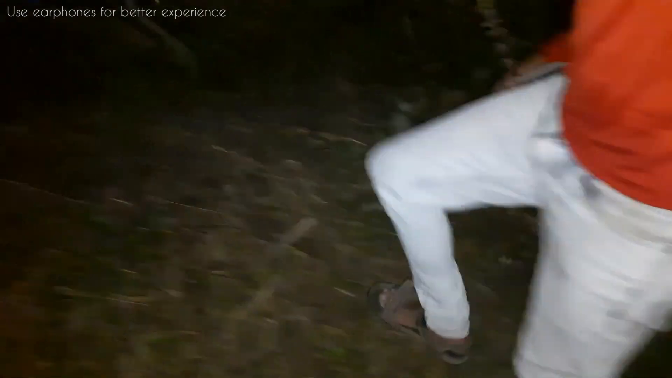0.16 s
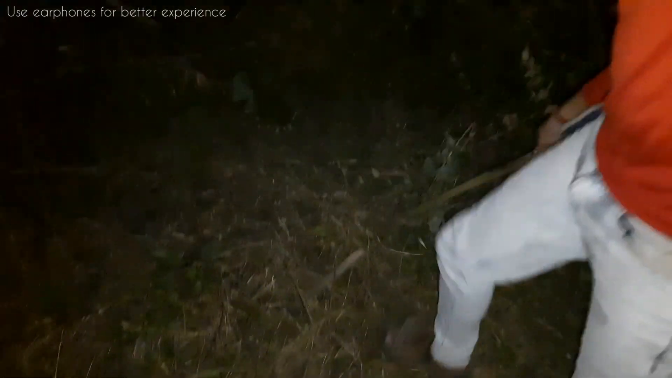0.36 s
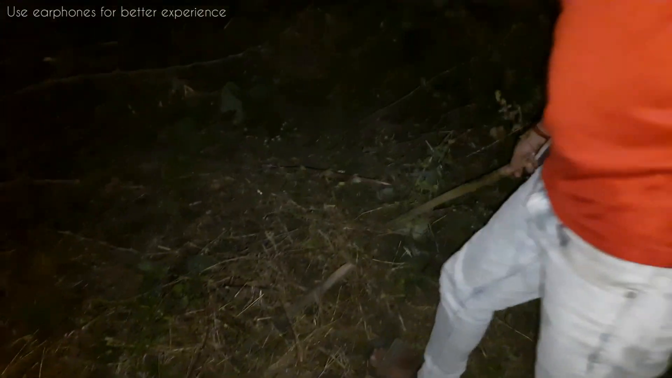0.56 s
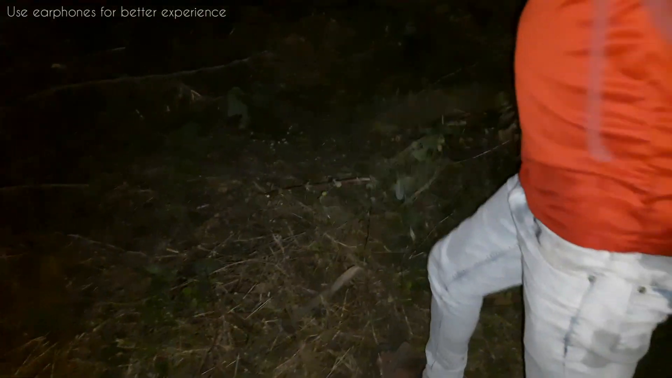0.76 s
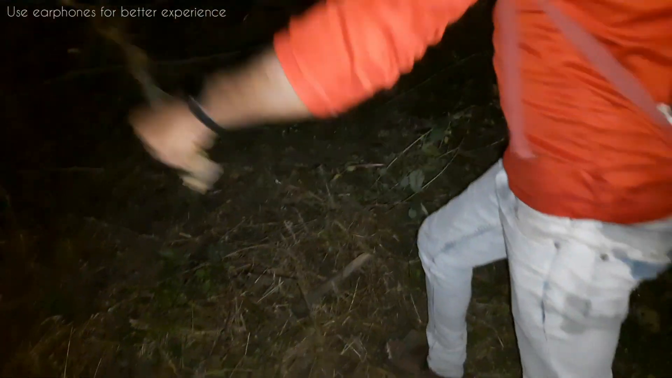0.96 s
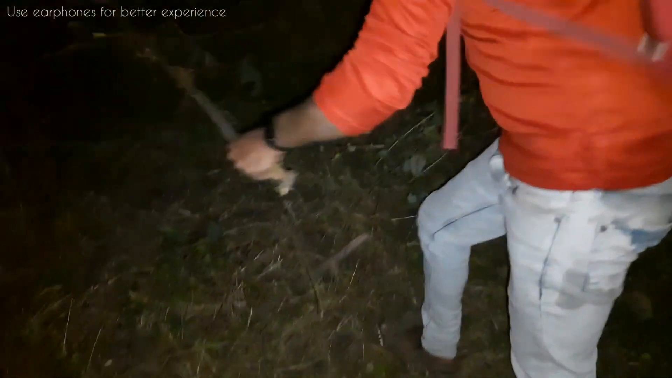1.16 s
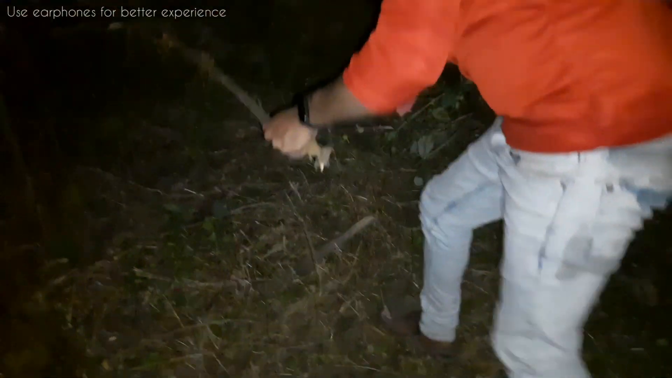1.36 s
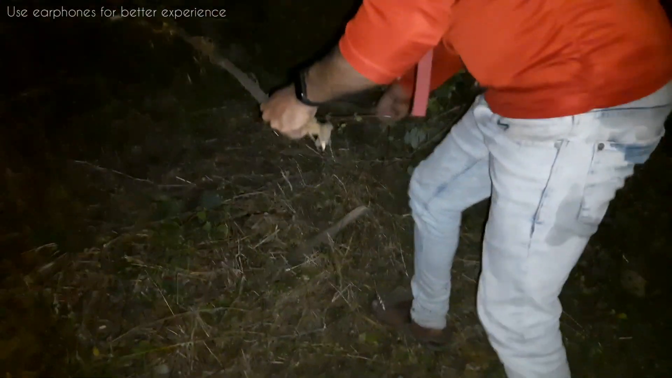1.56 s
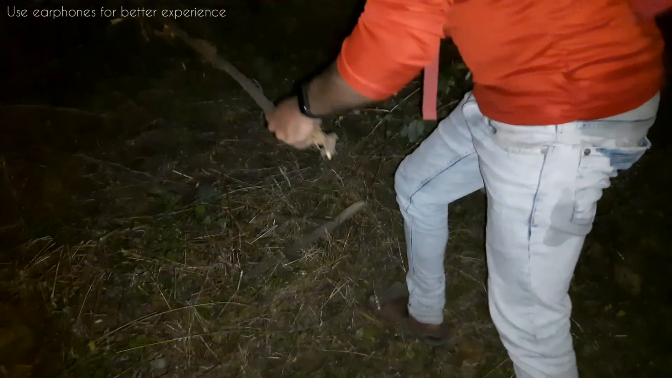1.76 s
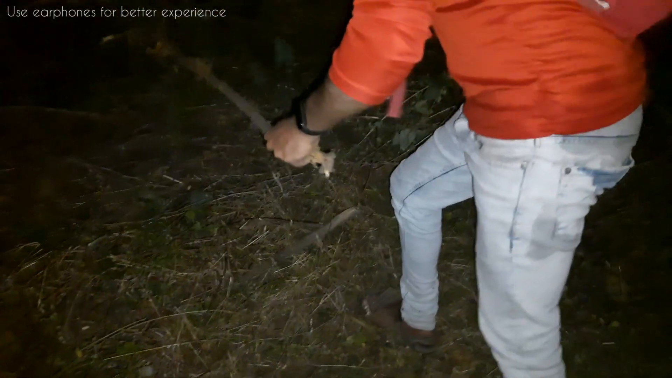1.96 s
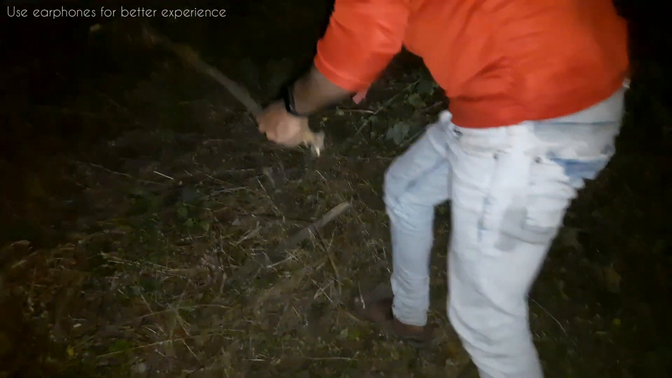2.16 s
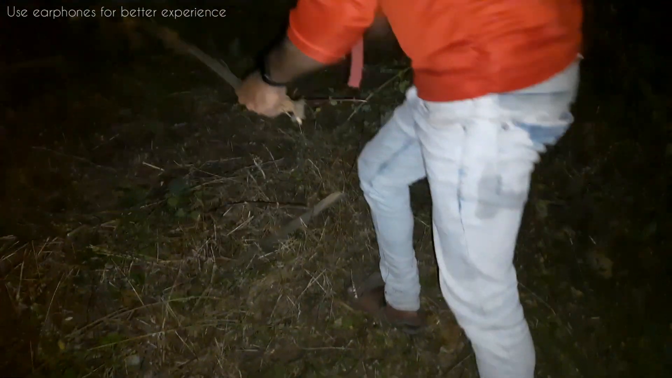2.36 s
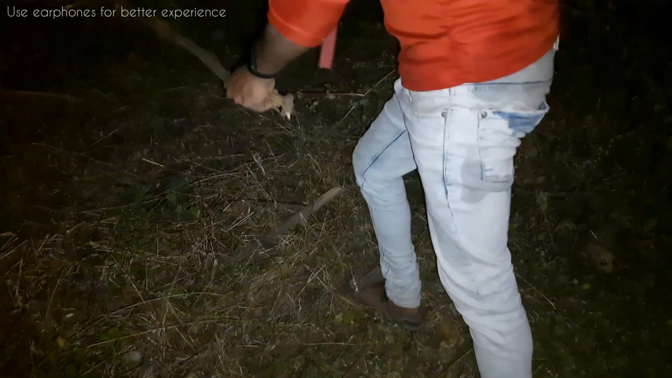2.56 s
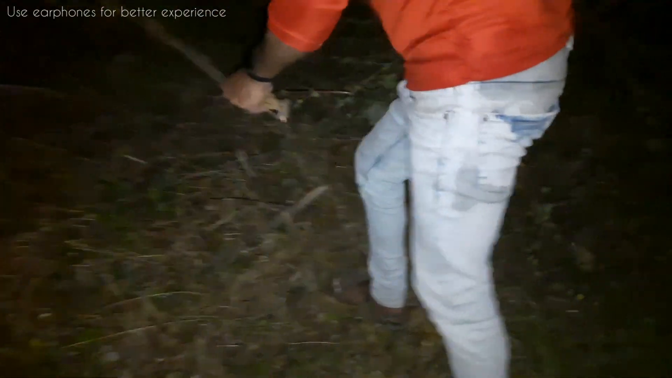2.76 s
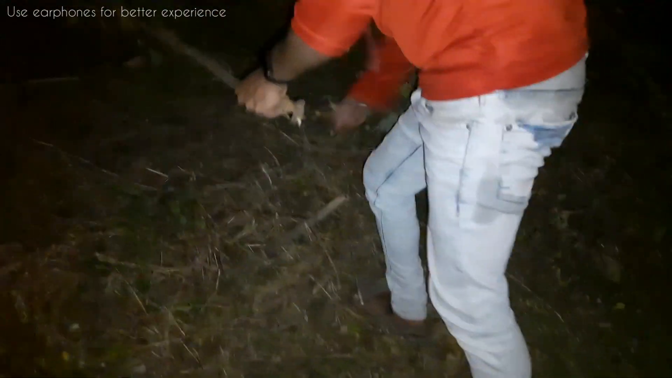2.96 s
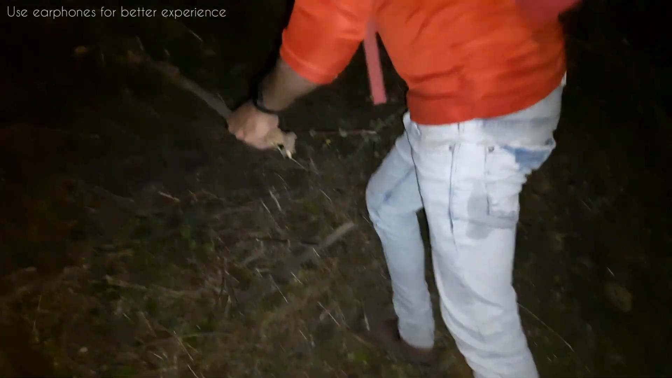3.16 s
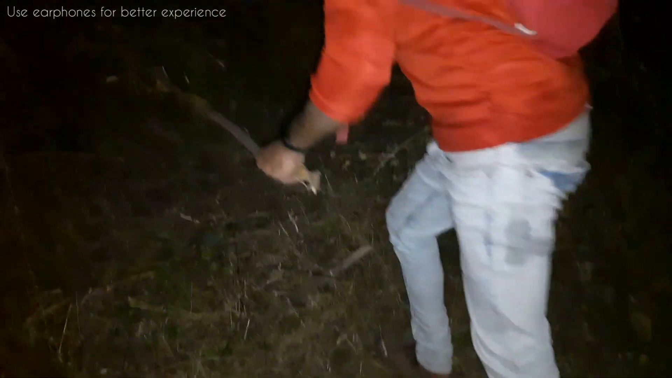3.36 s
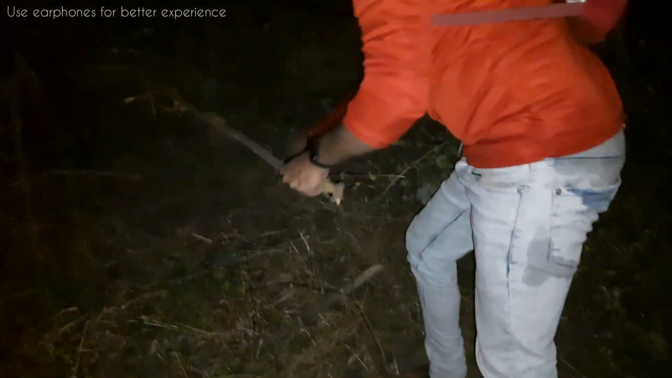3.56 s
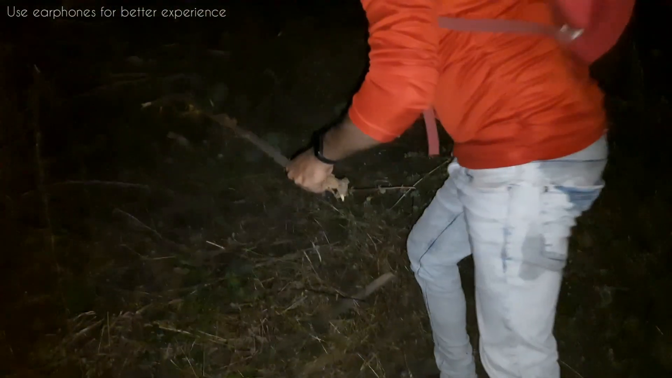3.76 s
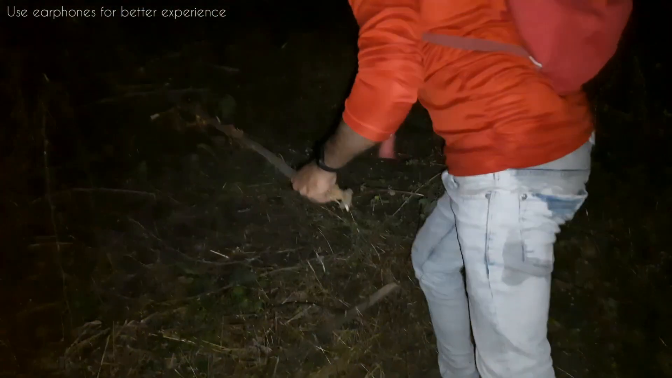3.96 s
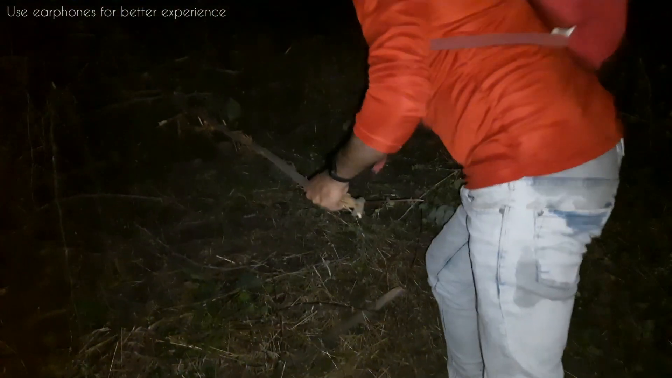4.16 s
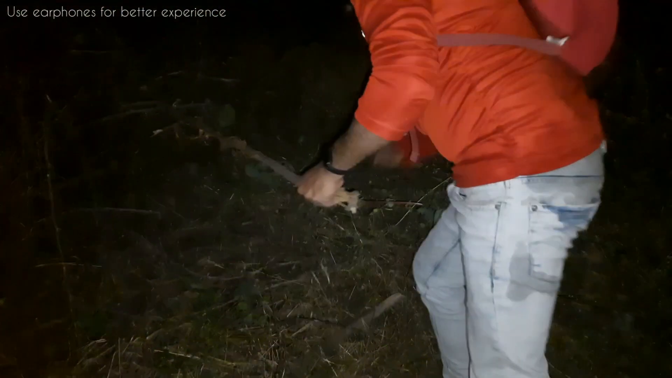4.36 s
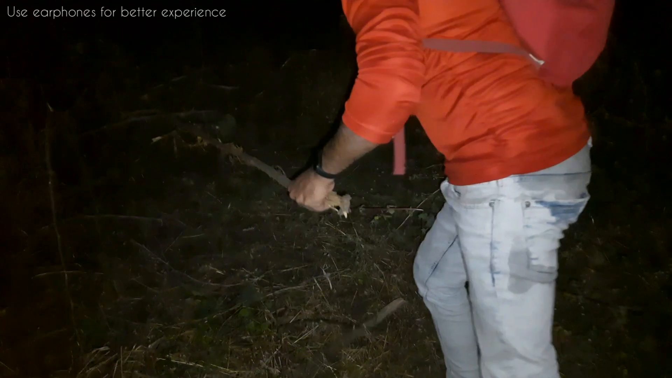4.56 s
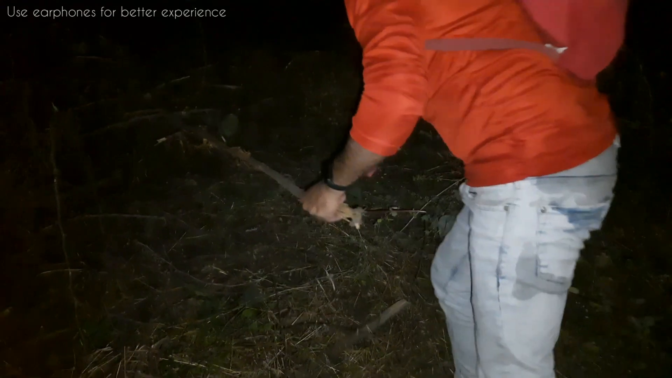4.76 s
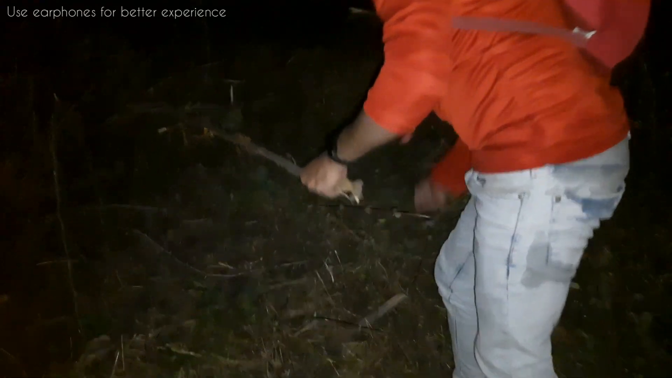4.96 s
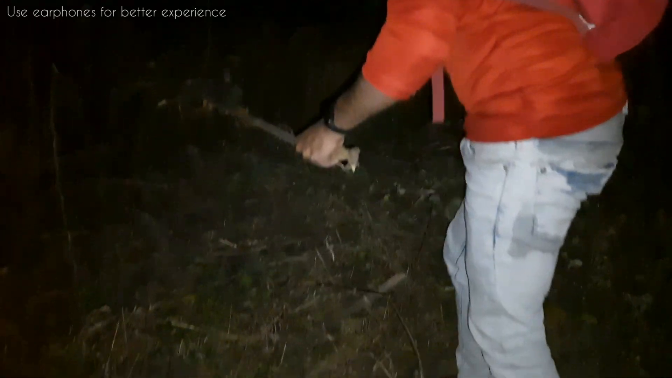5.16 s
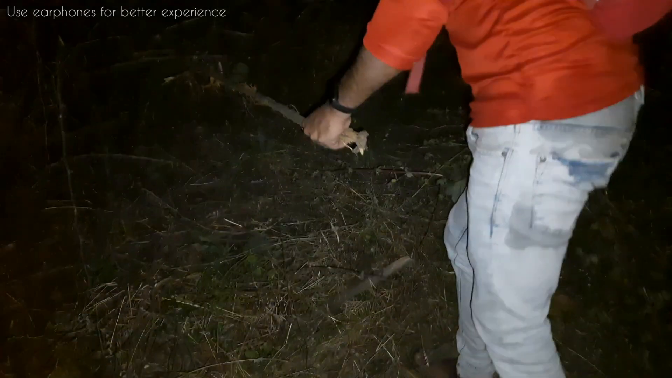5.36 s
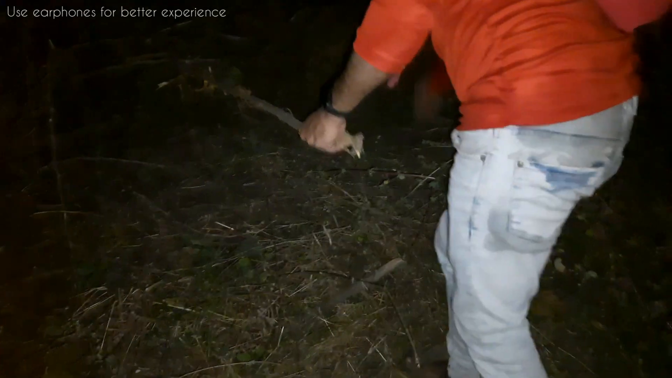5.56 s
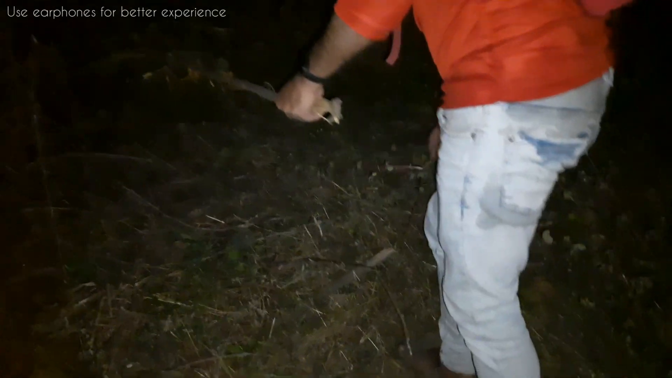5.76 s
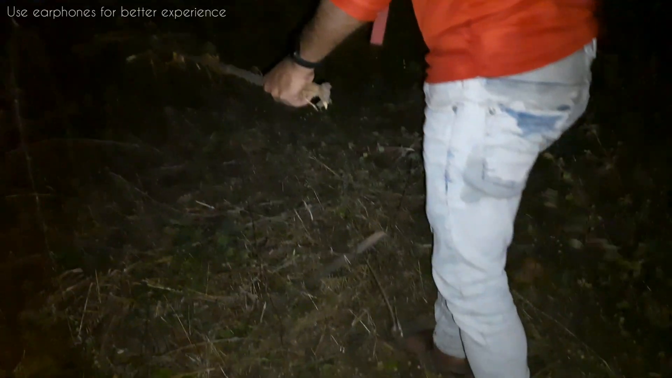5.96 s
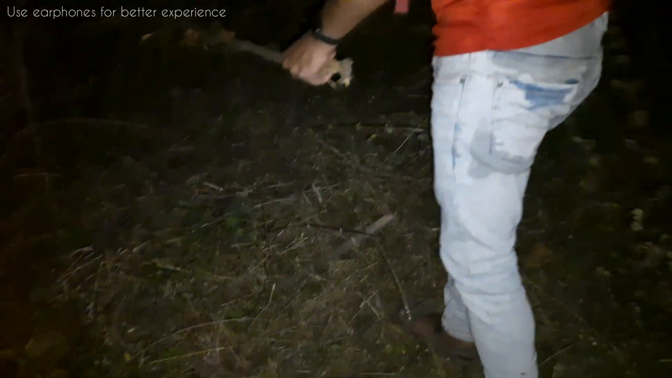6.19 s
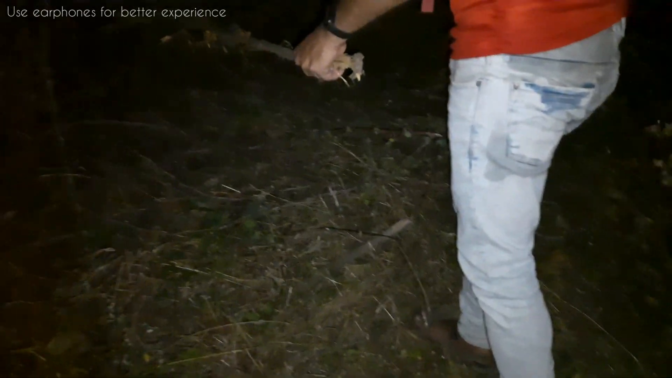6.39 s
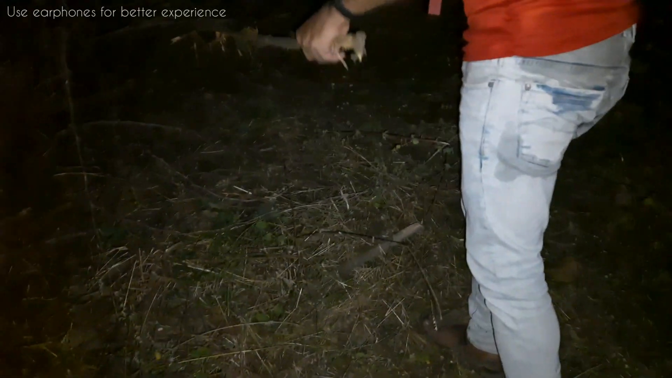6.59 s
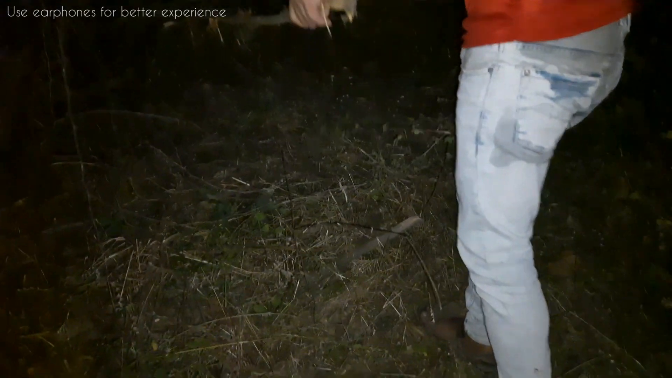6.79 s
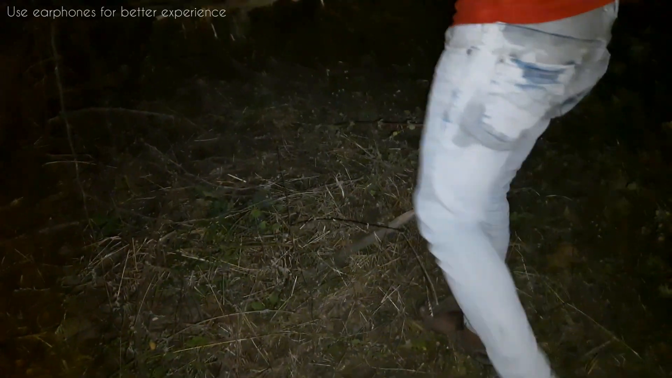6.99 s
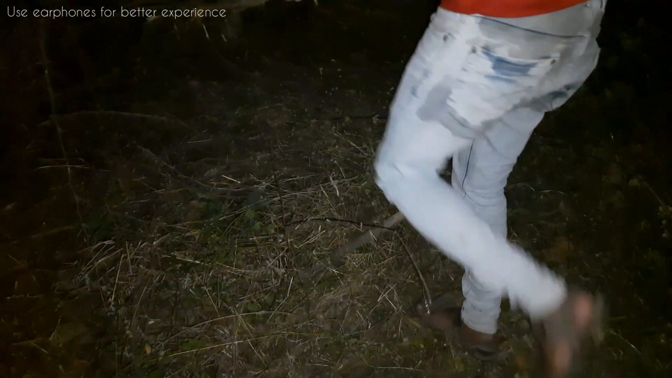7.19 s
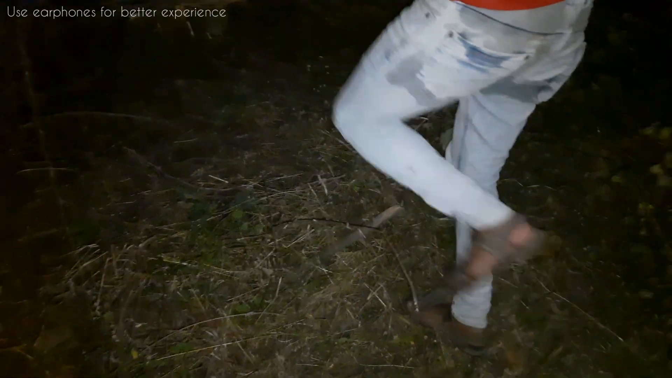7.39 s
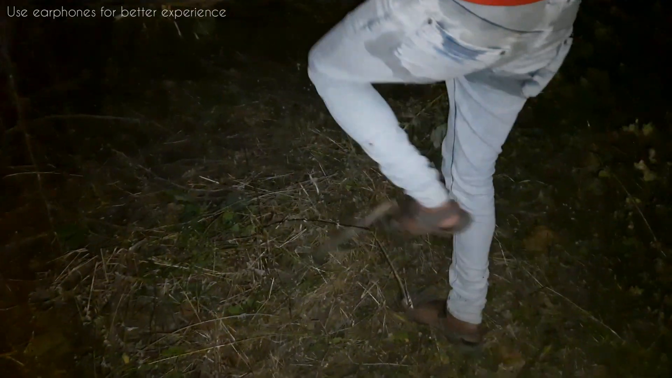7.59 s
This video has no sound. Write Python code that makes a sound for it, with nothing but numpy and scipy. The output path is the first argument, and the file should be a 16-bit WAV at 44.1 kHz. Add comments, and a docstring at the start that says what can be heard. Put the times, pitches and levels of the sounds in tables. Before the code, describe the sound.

Close, crisp swings of a stick beat down dry undergrowth in a steady rhythm, while grass rustles and crickets trill faintly.

```python
"""Beating down dry brush at night

Someone steps into thorny brush and beats it with a stick, seven swings, close to a phone. Each swing
displaces air, clips the outer twigs, crashes into the thicket and leaves the stems settling. Twigs snap
by brittle fracture, dead wood knocks in damped modes and dry blades rustle against the legs.
Crickets trill all round by stridulation, and a far animal yelps."""
import sys
import numpy as np
from scipy import signal
from scipy.fft import rfft, irfft
from scipy.io import wavfile

SR = 44100
rng = np.random.default_rng(int(sys.argv[2]) if len(sys.argv) > 2 else 0)


def dump_mix(stems):
    """Bounce the given channels to the path in sys.argv[1] as a 16-bit WAV at rate SR."""
    frames = np.atleast_2d(stems).T  # one column per channel
    limited = np.clip(frames, -1, 1)  # hard clip at full scale
    pcm = np.round(limited * 32767).astype(np.int16)
    wavfile.write(sys.argv[1], SR, pcm)


N = 336571
TIME = np.arange(N) / SR
TOP_HZ = 15950


# Swings of the stick; the first touch comes lead_s before the crash:
# crash_s, crash_db, lead_s, touch_db, rise_s, settle_db, thud_db, air_db, branch_hz, branch_db
SWINGS = [(1.386, -15, 0.031, -48, .012, -29.5, -46, -35, 1540, -13.5),
          (2.232, -15.5, 0.025, -18.5, 0.009, -31.5, -43, -41, 2320, -29),
          (2.925, -14, .0195, -15, 0.0091, -33.5, -33.5, -42.5, 3580, -9.5),
          (3.598, -16, 0.017, -12.5, 0.0026, -33.5, -39, -37.5, 3130, -20),
          (4.265, -13, .011, -15.5, 0.0019, -37, -38.5, -48, 3020, -15),
          (4.895, -15.5, 0.032, -37, 0.0055, -34, -38, -56, 5400, -10),
          (5.6258, -19.5, .0355, -13.5, 0.0021, -34.5, -41, -53, 3900, -16)]
def swings():
    """Impact excitation: the stick clips the outer twigs, ploughs on and stops; the thicket settles."""
    breaking = bending = settling = thud = air = branches = 0
    scrape = crackle(spread_db=5.5, count=40000)
    for crash_s, crash_db, lead_s, touch_db, rise_s, settle_db, thud_db, air_db, *branch in SWINGS:
        touch_s = crash_s - lead_s
        touched = TIME > touch_s
        ploughing = .4 * pulse(touch_s, .0006, .06) * (TIME < crash_s)
        touch = undb(touch_db) * np.maximum(pulse(touch_s, .0009, .004), ploughing)
        blow = .6 * pulse(crash_s, rise_s, .012) + .55 * pulse(crash_s, rise_s, .038)
        crash = undb(crash_db) * blow * touched
        flex = undb(crash_db) * pulse(crash_s + .00062, rise_s, .027) * touched
        settle = undb(settle_db) * pulse(crash_s + .026, .014, .13)
        breaking += touch + crash
        settling += settle
        bending += 1.57 * touch + flex + 2.03 * settle
        thud += undb(thud_db) * (pulse(crash_s + .0014, .012, .011) + .15 * pulse(crash_s, .01, .071))
        air += undb(air_db) * pulse(touch_s - .009, .014, .017)
        branches += branch_ring((1.3 * touch + .5 * crash) * scrape, touch_s, *branch)
    thicket = twigs(breaking, settling) + branches + stems(bending)
    return thicket + ground_thud(thud) + displaced_air(air, thud)


def branch_ring(force, touch_s, hz, db, size=22050):
    """Flexural vibration: the thickest branch in the way rings in its first two bending modes."""
    out = np.zeros((2, N))
    near = slice(int(touch_s * SR) - size // 10, int(touch_s * SR) + size)
    push = undb(db) * force[:, near]
    out[:, near] = resonance(push, hz, q=18) + .61 * resonance(push, 2.3 * hz, q=14)
    return out * pan(db=-3)


# Spectrum of breaking twigs: frequency_hz, level_db
TWIG_SPECTRUM = [(500, -47), (1200, -8), (2200, -2.5), (3300, -2.5), (5500, -1.5), (8000, -1.5),
                 (10000, -3), (12300, 2), (15500, -4)]
def twigs(breaking, settling):
    """Superposition: thousands of tiny fractures merge into a bright crash."""
    fractures = breaking * crackle(spread_db=0, count=140000)
    ticks = settling * crackle(spread_db=-.5, count=70000)
    return colour(fractures + ticks, TWIG_SPECTRUM) * pan(db=1.5)


# Spectrum of thick stems: frequency_hz, level_db
STEM_SPECTRUM = [(100, -10.5), (300, 0.5), (520, -8.5), (820, 0.5), (1000, 0), (1300, -10), (1800, -2),
                 (3000, -8.5), (6000, -9)]
def stems(bending):
    """Bending stress: thick stems give way in sparser, lower crackles."""
    cracks = bending * crackle(spread_db=2, count=20000, port_lag_s=.00021)
    return undb(-12.5) * colour(cracks, STEM_SPECTRUM)


# Spectrum of the thud: frequency_hz, level_db
THUD_SPECTRUM = [(20, -19), (55, -10.5), (120, 0.5), (250, -11), (400, -23), (800, -15), (3000, -51)]
def ground_thud(thud):
    """Heavy damping: the ground answers a blow with a short burst of bass noise."""
    return colour(thud * noise(side=.33), THUD_SPECTRUM)


# Spectra of the draught and of the air ahead of the stick: frequency_hz, level_db
DRAUGHT_SPECTRUM = [(20, -26), (55, -1), (85, -9), (150, -10), (1000, -68)]
AIR_SPECTRUM = [(30, -16), (100, -11.5), (180, 3.5), (290, -4), (450, -17), (1000, -45), (4000, -65)]
def displaced_air(air, thud):
    """Turbulence: air is pushed ahead of the stick; its draught hits mainly one microphone port."""
    gust = np.roll(thud, int(.0064 * SR)) * rng.standard_normal((2, N))  # just after the thud
    draught = undb(-6) * colour(gust, DRAUGHT_SPECTRUM) * pan(db=9)
    return draught + colour(air * noise(side=.097), AIR_SPECTRUM)


def struck_twigs():
    """Overload: one twig breaks at first touch and two at the crash, louder for a harder blow."""
    rows = []  # columns as in TWIG_SNAPS
    for crash_s, crash_db, lead_s, touch_db, *_ in SWINGS:
        rows.append((crash_s - lead_s, touch_db + 1.5, 5000, 0))
        for when, pitch in rng.uniform(-1, 1, (2, 2)):
            rows.append((crash_s + .003 * when, crash_db - 2, 9000 * 2 ** (.3 * pitch), 2))
    return rows


# Single twigs breaking underfoot or under the stick: start_s, level_db, ring_hz, pan_db
TWIG_SNAPS = [(0.0266, -23.5, 12670, 6), (.255, -29, 12300, 8), (0.464, -25, 9900, 3),
              (0.5447, -28, 1900, -2), (1.004, -26, 3370, 1), (1.004, -18.5, 8800, -3),
              (1.084, -27, 11000, 1), (1.123, -13, 10500, -3), (1.251, -15.5, 11900, 2.5),
              (1.453, -16, 10200, 8), (1.509, -26, 11900, 4), (2.2209, -10.5, 2300, 2),
              (2.352, -19.5, 9800, -4), (2.437, -30.5, 11400, 4), (2.9057, -11.5, 3500, 0),
              (3.316, -38, 7650, 3), (3.993, -35, 4730, -3), (4.221, -36.5, 2400, -3),
              (4.712, -31.5, 2220, -1), (4.894, -10, 6000, -14.5), (5.634, -9, 9400, 2),
              (6.429, -34.5, 6800, -4), (6.939, -38.5, 7100, -3), (7.559, -35.5, 8100, 1)]
def snaps(size=4096):
    """Brittle fracture: a twig parts in about a millisecond and rings; stems scatter the crack."""
    out, t = np.zeros((2, N + size)), np.arange(size) / SR
    envelope = (1 - np.exp(-t / .0001)) * (np.exp(-t / .0008) + .15 * np.exp(-t / .005))
    for s, db, hz, pan_db in TWIG_SNAPS + struck_twigs():
        band = signal.butter(2, [hz * .56, min(hz * 1.74, TOP_HZ)], "band", fs=SR, output="sos")
        fibres = rng.standard_normal((2, size)) * envelope
        crack = signal.sosfilt(band, fibres) + .05 * fibres + .24 * resonance(fibres, hz, q=9)
        crack /= np.sqrt(np.sum(crack ** 2, axis=1, keepdims=True) / (SR / 1000))  # equal energy
        start = max(int(s * SR), 0)
        out[:, start:start + size] += undb(db) * pan(pan_db) * crack
    return out[:, :N]


# Knocks on dead wood, the last one a dull footfall: start_s, relative_level_db
WOOD_KNOCKS = [(.522, -31.5), (.546, -26), (1.086, -37), (1.126, -23.5), (1.239, -25), (1.282, -30),
               (2.3504, -17), (6.429, -41), (6.965, -37)]
# Modes of the wood: frequency_hz, t60_s, level_db
WOOD_MODES = [(424, 0.034, 1), (566, 0.021, -1), (878, 0.019, 4), (1530, .016, -3), (2140, 0.012, -2.5)]
def knocks(size=4096):
    """Modal decay: dead branches, each of a slightly different length, are damped by the ground; the last knock
    is a dull footfall."""
    out, t = np.zeros(N + size), np.arange(size) / SR
    for s, db in WOOD_KNOCKS:
        detunes = 1 + .06 * rng.standard_normal(len(WOOD_MODES))
        ring = sum(undb(mode_db) * np.cos(2 * np.pi * hz * detune * t) * np.exp(-np.log(1000) * t / t60)
                   for (hz, t60, mode_db), detune in zip(WOOD_MODES, detunes))
        litter = .044 * rng.standard_normal(size) * np.exp(-t / .008)
        out[int(s * SR):int(s * SR) + size] += undb(db - 10.5) * (ring + litter)
    return out[:N] * pan(db=2)


# Steps and shifts of the legs: middle_s, half_length_s, blades_db, crunch_db, shuffle_db
STEPS = [(.07, 0.096, -36, -57.5, -52.5), (.48, 0.079, -40.5, -47, -56), (.68, 0.26, -40, -57.5, -60.5),
         (1.05, 0.074, -38.5, -49.5, -54.5), (1.28, 0.069, -37, -43, -52.5), (1.84, 0.062, -46, -53.5, -79),
         (5.81, 0.037, -39, -49, -61), (6.28, 0.079, -50, -57.5, -64.5), (6.98, 0.053, -47.5, -61, -58.5),
         (7.125, 0.028, -40, -78, -57.5), (7.52, 0.34, -56.5, -90, -65)]
# Body movements with each swing: the same columns, timed from the crash
LEAN_IN, PULL_BACK = (-.065, .04, -52, -63, -64), (-.43, .58, -59.5, -70.5, -81)
STANDING_DB = (-57, -71.5, -66)  # blades, crunch and shuffle between movements
def stirring():
    """Incoherent addition: the powers of all movements sum into gains for blades, crunch and shuffle."""
    moves = list(STEPS)
    for crash_s, *_ in SWINGS:
        moves += [(crash_s + offset_s, *rest) for offset_s, *rest in (LEAN_IN, PULL_BACK)]
    power = undb(STANDING_DB)[:, None] ** 2
    for s, half_s, *levels_db in moves:
        power = power + undb(levels_db)[:, None] ** 2 * swell(s, half_s) ** 2
    return np.sqrt(power)


# Spectra of dry blades, leaf litter, and cloth and soles: frequency_hz, level_db
BLADE_SPECTRUM = [(800, -19.5), (2500, -14), (5000, -9.5), (8000, -3.5), (10000, -5), (12500, 2.5),
                  (15500, -3.5)]
CRUNCH_SPECTRUM = [(150, -15), (450, -1.5), (1000, 2), (1800, 4), (3000, 3), (6000, -0.5), (12000, -67)]
SHUFFLE_SPECTRUM = [(20, -16), (60, -1), (110, 1.5), (200, -4.5), (400, -3), (580, -19.5), (1200, -23),
                    (5000, -64)]
def rustle():
    """Friction: blades tick on the legs, thorns catch and slip, litter crunches, soles shuffle."""
    brushing, crunching, shuffling = stirring()
    flurry = undb(2.1 * walk(rate_hz=45))
    ticks = brushing * flurry * crackle(spread_db=-.5, count=50000)
    blades = colour(ticks, BLADE_SPECTRUM) * pan(db=2.5)
    litter = crunching * flurry * crackle(spread_db=1.5, count=24000, port_lag_s=.00021)
    shuffle = colour(shuffling * noise(side=.33), SHUFFLE_SPECTRUM) * pan(db=.5)
    catches = undb(-9) * brushing * crackle(spread_db=4.5, count=350)[0]
    thorns = colour(scatter(catches, t60_s=.015), BLADE_SPECTRUM)
    return blades + thorns + colour(litter, CRUNCH_SPECTRUM) + shuffle


# Calls of the far animal: start_s, length_s, pitch_hz, level_db, strain (0 to 1)
YELPS = [(0.809, 0.085, 1333, -49, 0.18), (1.176, 0.083, 1290, -55, 0), (7.105, 0.086, 1218, -59, 0.94),
         (7.349, 0.093, 1344, -52.5, 0.5), (7.466, 0.058, 1280, -52, 0.73)]
# Their spectrum at full strain: harmonic_number, level_db
YELP_HARMONICS = [(1, -10.5), (2, 1.5), (3, -1), (4, 1.5)]
def yelps():
    """Phonation: each call holds, then droops; strain adds hoarseness and harmonics beside the second."""
    out = np.zeros(N)
    for s, length_s, hz, db, strain in YELPS:
        progress = np.clip((TIME - s) / length_s, 0, 1)
        on = (progress > 0) & (progress < 1)
        hoarse = .1 * strain * progress * walk(rate_hz=700)
        pitch_hz = hz * (1 - .155 * progress ** 3.3 + hoarse)[on]
        phase = 2 * np.pi * np.cumsum(pitch_hz) / SR
        envelope = np.sin(np.pi * progress[on]) ** .5 * undb(db + 2 * walk(rate_hz=230)[on])
        out[on] += envelope * sum(undb(level_db) * (1 if k == 2 else strain) * np.sin(k * phase)
                                  for k, level_db in YELP_HARMONICS)
    return out + .5 * scatter(out, t60_s=.26)


def cricket(stroke_rate_hz, start_hz, end_hz, db, pan_db):
    """Stridulation: each stroke is a tone that falls as the wing slows; grass makes it fade and blur."""
    stroke = np.cumsum(stroke_rate_hz * (1 + .077 * walk(rate_hz=20))) / SR % 1
    pitch_hz = start_hz + (end_hz - start_hz) * stroke + 110 * walk(rate_hz=250)
    envelope = 2 * undb(db + 1.5 * walk(rate_hz=35)) * np.sin(np.pi * stroke) ** 2
    song = envelope * np.sin(2 * np.pi * np.cumsum(pitch_hz) / SR)
    return pan(pan_db) * (.35 * song + .93 * scatter(song, t60_s=.09))


# Spectrum of the far crickets: frequency_hz, level_db
CHORUS_SPECTRUM = [(4500, -48), (5700, -11.5), (6300, 1.5), (6950, 0.5), (7400, -9.5), (7900, -6),
                   (9500, -18)]
# Near crickets: stroke_rate_hz, start_hz, end_hz, level_db, pan_db
NEAR_CRICKETS = [(31.87, 7700, 6750, -61.5, -10.5), (46.8, 7250, 6300, -65.5, -12.5)]
# Rise and fall of both together: time_s, gain_db
TRILL_GAIN = [(.95, 8.5), (1.5, 2), (6.6, 3), (7.25, 8)]
def high_crickets():
    """Superposition: many far songs blur into a band of noise behind two near ones."""
    gain_db = np.interp(TIME, *np.transpose(TRILL_GAIN))
    chorus = undb(-60) * colour(noise(side=1), CHORUS_SPECTRUM)
    return undb(gain_db) * (chorus + sum(cricket(*row) for row in NEAR_CRICKETS))


# Bouts of louder song: middle_s, half_length_s, boost_db
SONG_BOUTS = [(.28, .1, 14), (.92, .07, 11), (6.05, .11, 6), (6.78, .06, 5.5), (7.42, .12, 9)]
def low_cricket():
    """Amplitude modulation: one lower cricket swells above its quiet trill in bouts."""
    singing = 1 + sum((undb(db) - 1) * swell(s, half_s) for s, half_s, db in SONG_BOUTS)
    return singing * cricket(stroke_rate_hz=30, start_hz=4180, end_hz=3880, db=-67.5, pan_db=0)


# Spectrum of the still air: frequency_hz, level_db
NIGHT_SPECTRUM = [(30, -9), (100, -4.5), (400, -5), (700, -9), (2000, -4), (5000, -0.5), (10000, -4.5),
                  (15500, -22)]
def night_air():
    """Ambient noise: a faint broadband hiss whose level drifts slowly."""
    return undb(-59.5 + walk(rate_hz=2.17)) * colour(noise(side=1), NIGHT_SPECTRUM)


def undb(db):
    """Logarithmic level: decibels to amplitude gain."""
    return 10 ** (np.asarray(db) / 20)


def pan(db):
    """Level difference: channel gains for left minus right in decibels."""
    return undb(np.array([[db], [-db]]) / 2)


def pulse(s, rise_s, fall_s):
    """Exponential growth up to time s and decay after it."""
    t = TIME - s
    return np.exp(-np.minimum(np.maximum(-t / rise_s, t / fall_s), 20))


def swell(s, half_s):
    """Hyperbolic secant: a rounded envelope around time s."""
    return 1 / np.cosh(np.clip((TIME - s) / half_s, -20, 20))


def walk(rate_hz):
    """Random modulation: interpolated chance values with a spread near 1."""
    return 1.2 * np.interp(TIME * rate_hz, np.arange(8192), rng.standard_normal(8192))


def noise(side):
    """Partial coherence: the channels are alike at side=0 and independent at side=1."""
    mid, other = rng.standard_normal((2, N))
    return np.array([mid + side * other, mid - side * other]) / np.sqrt(1 + side ** 2)


def crackle(spread_db, count, port_lag_s=.00032, scatter_db=3):
    """Shot noise: tiny fractures arrive from all directions, so only the bass is alike in both ears."""
    at = rng.integers(0, N, count)
    strength = rng.standard_normal(count) * undb(spread_db * np.minimum(rng.exponential(size=count), 5))
    lag = np.round(rng.uniform(-1, 1, count) * port_lag_s * SR).astype(int)
    pan_db = scatter_db * rng.standard_normal(count)
    left = np.bincount(at, strength * undb(pan_db / 2), N)
    right = np.bincount((at + lag) % N, strength * undb(-pan_db / 2), N)
    return np.array([left, right]) / np.sqrt(np.mean(left ** 2))


def colour(x, spectrum, size=2048):
    """Minimum-phase filtering to the shape of a spectrum; white input keeps its power."""
    hz, db = np.transpose(spectrum)
    grid_hz = np.maximum(np.arange(size // 2 + 1) * SR / size, 1)
    gain = undb(np.interp(np.log(grid_hz), np.log(hz), db))
    cepstrum = irfft(np.log(gain))
    cepstrum[1:size // 2] *= 2  # folding makes the filter causal
    cepstrum[size // 2 + 1:] = 0
    response = irfft(np.exp(rfft(cepstrum)))
    return signal.oaconvolve(x, response[None] / np.linalg.norm(response), axes=1)[:, :N]


def resonance(x, hz, q):
    """Resonance of one lightly damped mode; white input keeps its power."""
    hz = min(hz, .4 * SR)
    b, a = signal.iirpeak(hz, q, fs=SR)
    return signal.lfilter(b, a, x) * np.sqrt(q * SR / (np.pi * hz))


def scatter(x, t60_s, size=8192):
    """Multiple scattering: sound reaches each ear by many short paths through the undergrowth."""
    paths = rng.standard_normal((2, size)) * np.exp(-np.log(1000) * np.arange(size) / SR / t60_s)
    paths /= np.linalg.norm(paths, axis=1, keepdims=True)
    return signal.oaconvolve(x[None], paths, axes=1)[:, :N]


def scene():
    """Free field: the sources add in open air, with no walls to reflect them."""
    return swings() + snaps() + knocks() + rustle() + high_crickets() + low_cricket() + night_air() + yelps()


def record(dry):
    """Saturation and band limiting: the phone rounds the highest peaks and cuts the top."""
    lowpass = signal.ellip(10, .2, 70, TOP_HZ, fs=SR, output="sos")
    return signal.sosfilt(lowpass, np.tanh(dry))


dry = scene()
out = record(dry)
dump_mix(out)
```